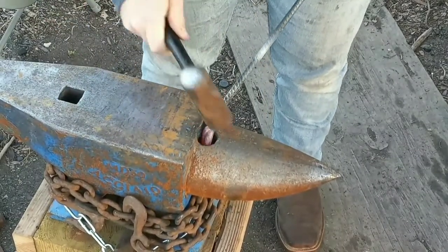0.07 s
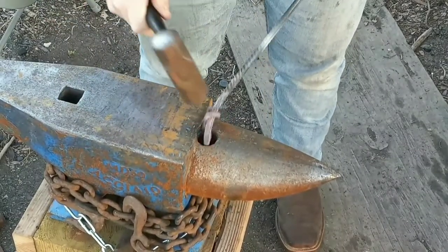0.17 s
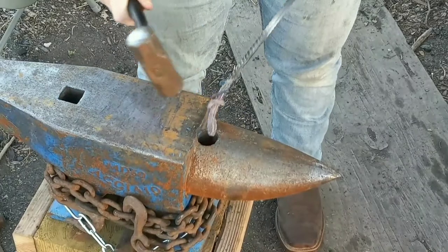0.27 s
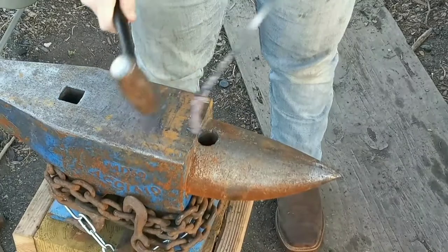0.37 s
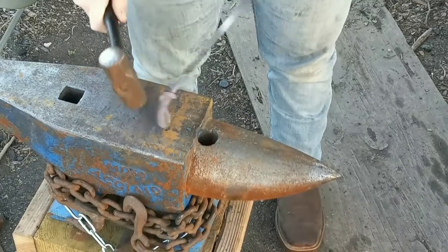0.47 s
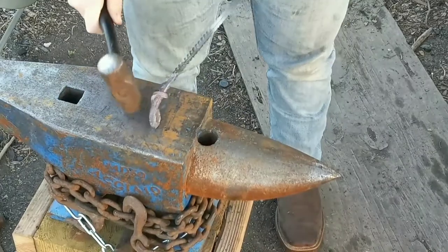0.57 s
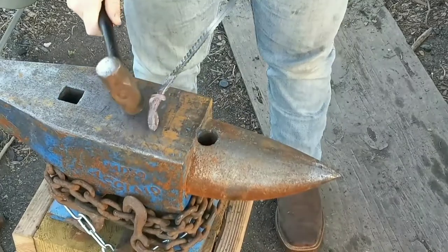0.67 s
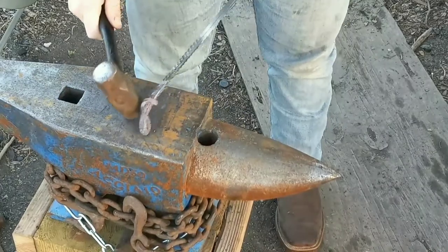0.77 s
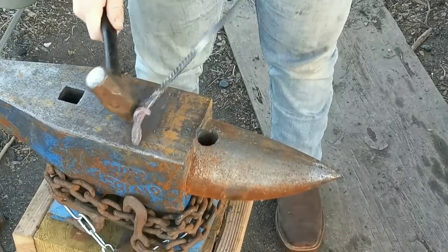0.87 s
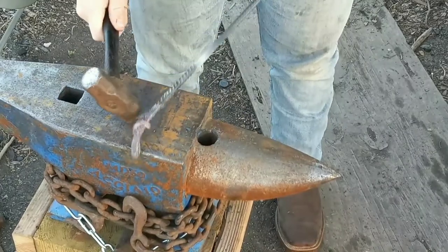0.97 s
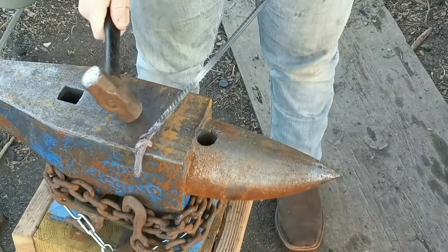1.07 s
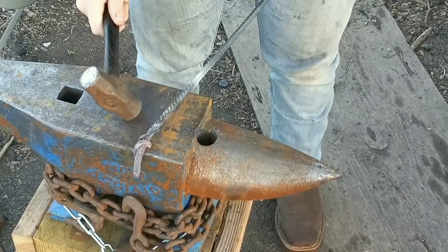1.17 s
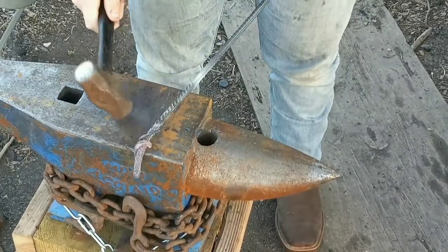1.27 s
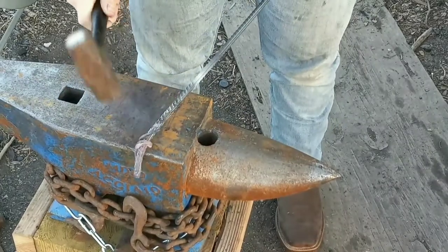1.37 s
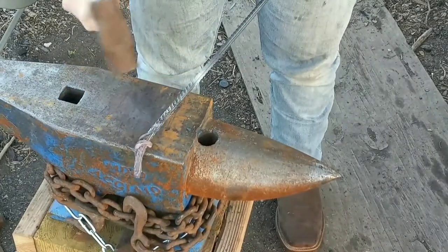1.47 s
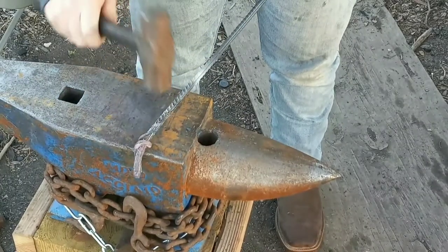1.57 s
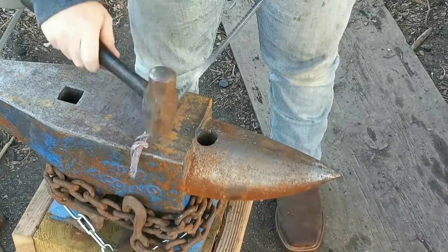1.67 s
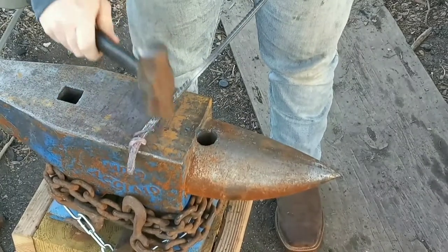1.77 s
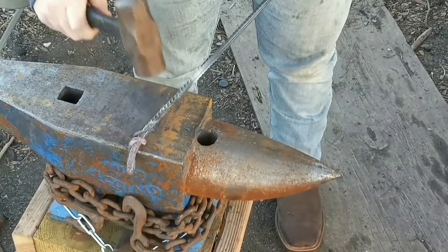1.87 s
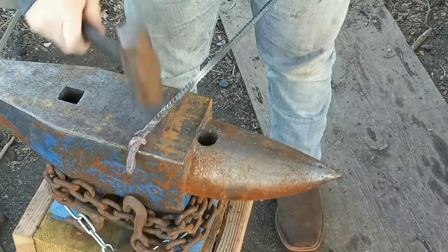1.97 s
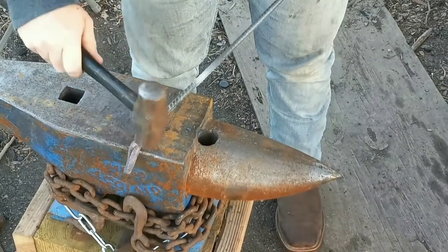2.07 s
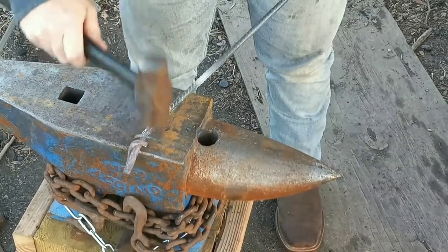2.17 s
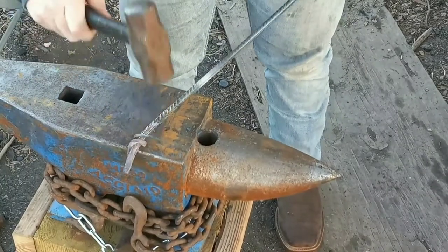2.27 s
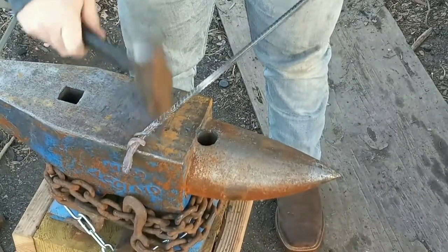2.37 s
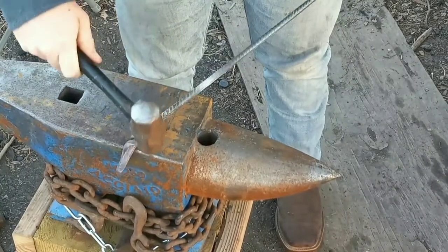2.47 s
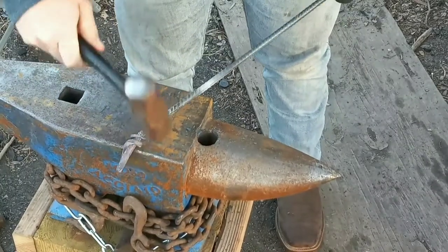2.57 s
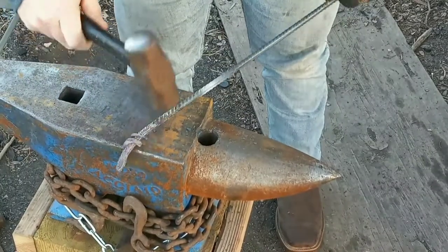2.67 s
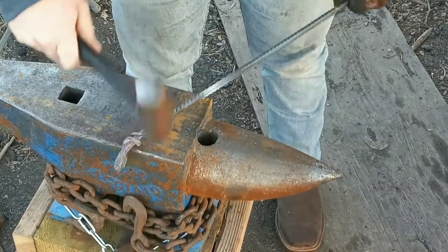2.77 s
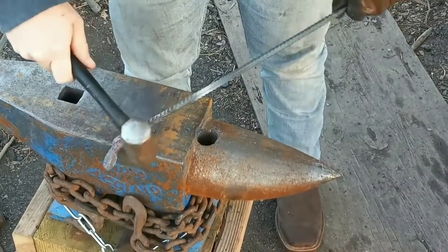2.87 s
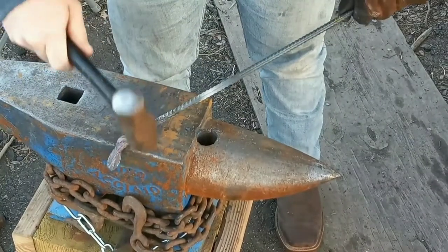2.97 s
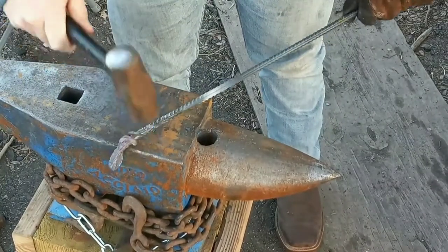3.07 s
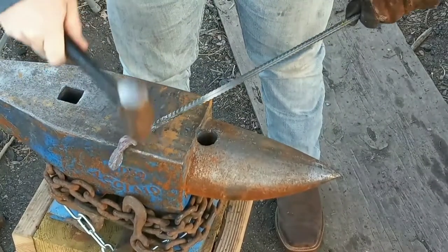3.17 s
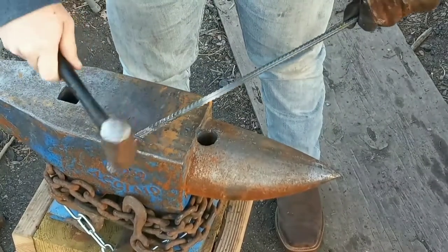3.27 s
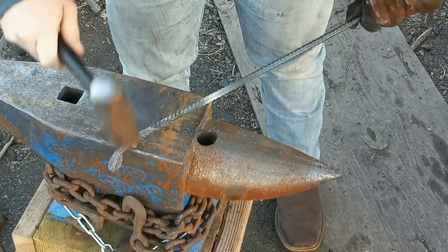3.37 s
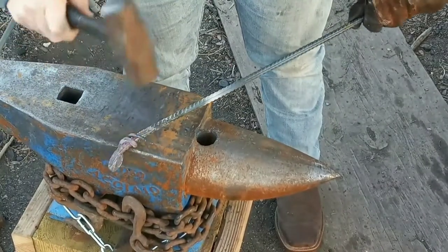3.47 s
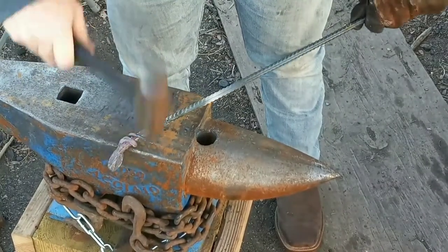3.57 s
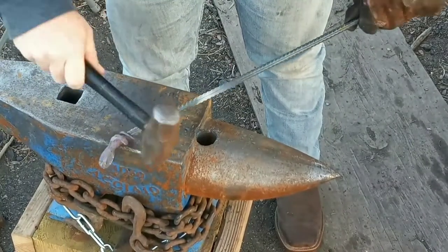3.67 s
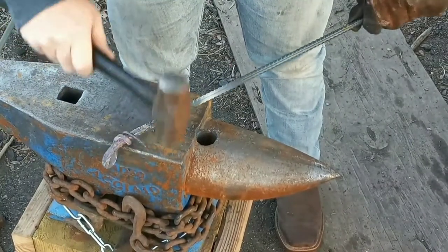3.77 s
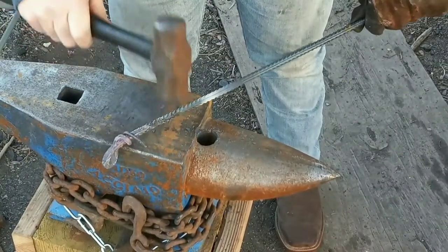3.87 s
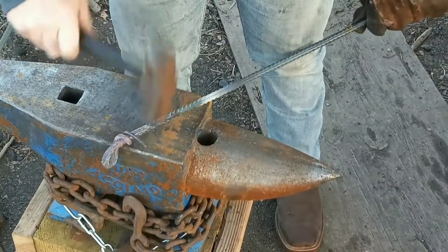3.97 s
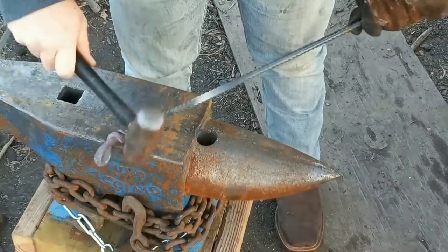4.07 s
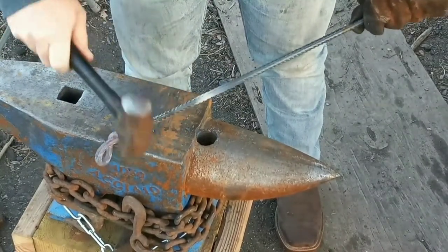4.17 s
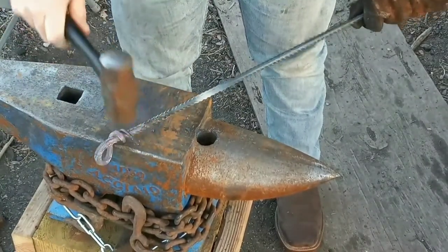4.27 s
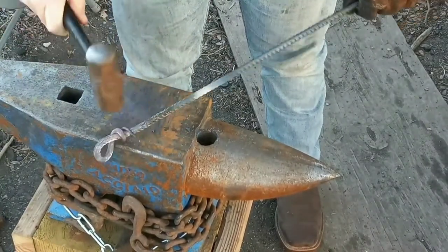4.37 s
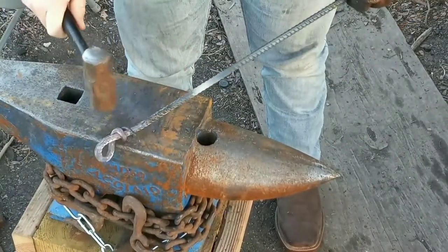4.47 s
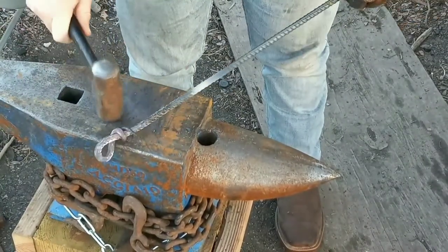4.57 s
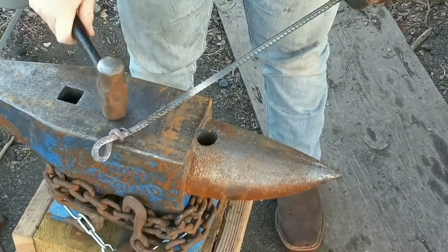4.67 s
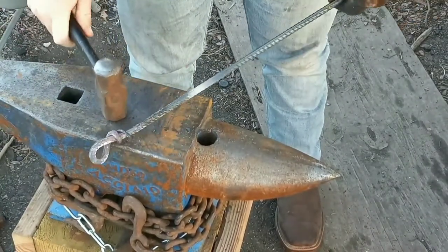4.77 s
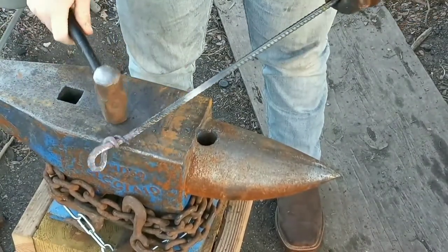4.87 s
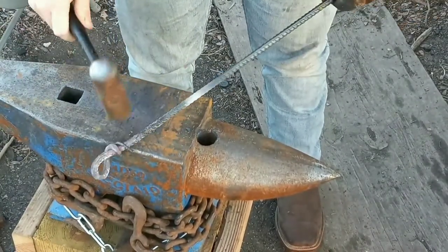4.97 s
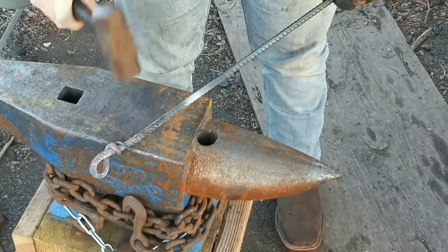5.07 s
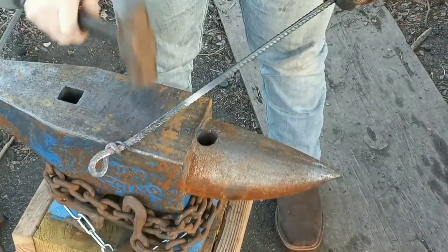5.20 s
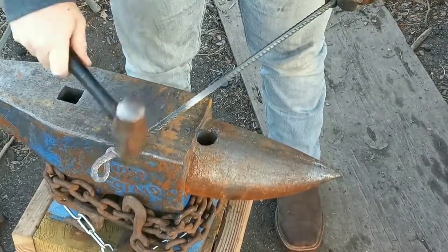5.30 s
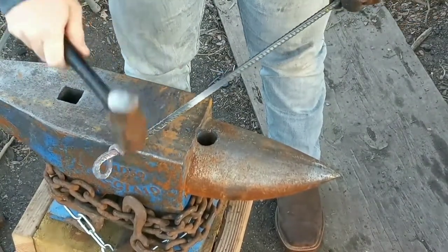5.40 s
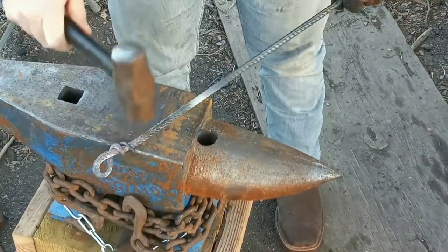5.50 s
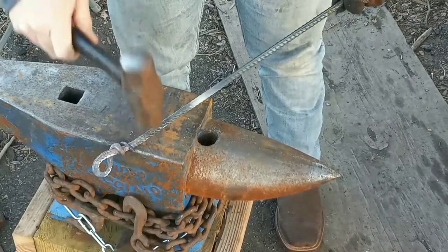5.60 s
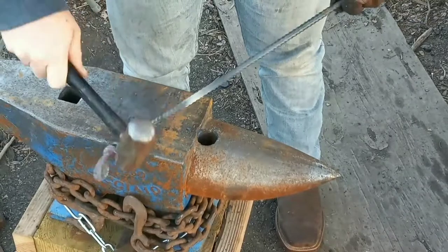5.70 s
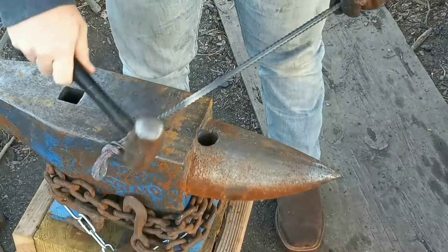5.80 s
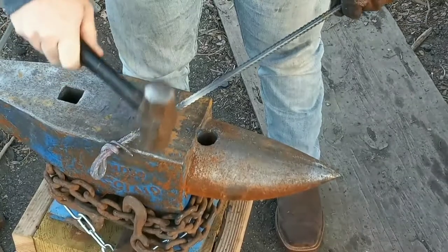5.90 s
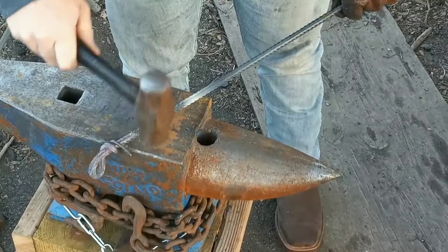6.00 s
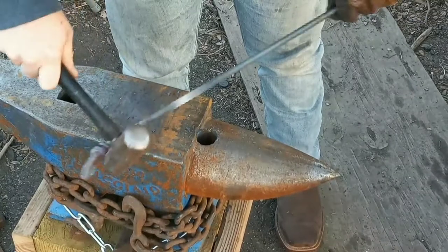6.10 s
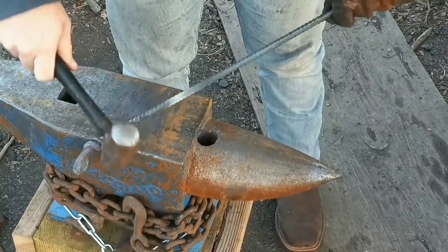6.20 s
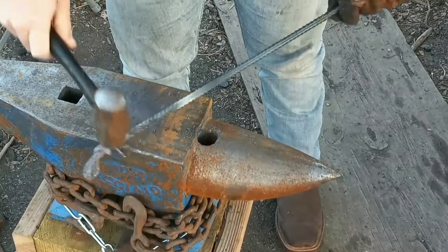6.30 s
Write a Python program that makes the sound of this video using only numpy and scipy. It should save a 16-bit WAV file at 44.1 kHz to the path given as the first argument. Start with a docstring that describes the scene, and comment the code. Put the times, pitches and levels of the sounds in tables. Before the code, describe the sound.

A hammer clatters to rest on an anvil in sharp, ringing bounces, then beats a hot steel bar with even, gritty knocks that gain force. A second run of bounces leads into three more dull blows, with small ticks and a faint hum from the bar. The microphone is close, in an open yard with very little echo and a soft, uneven wind rumble.

```python
"""A hand hammer works a hot steel bar on a chained anvil, outdoors and close up.
On the soft hot bar it lands with a dull crunch of cracking scale; dropped on the bare face it
bounces, rings the anvil and rattles the chain. The bar ticks, scrapes and hums at its cold end.
Wind buffets both microphone ports over a faint yard echo, a far murmur and a thin hiss."""
import sys
import numpy as np
from scipy import signal
from scipy.fft import rfft, irfft, next_fast_len
from scipy.io import wavfile
from scipy.ndimage import map_coordinates

SR = 44100
rng = np.random.default_rng(int(sys.argv[2]) if len(sys.argv) > 2 else 0)


def file_out(sig):
    """Save sig as 16-bit WAV at sys.argv[1]."""
    # one column per channel
    cols = np.atleast_2d(sig).T
    # limit, then scale
    lim = np.clip(cols, -1, 1)
    pcm = np.round(lim * 32767).astype(np.int16)
    wavfile.write(sys.argv[1], SR, pcm)


N = 279594
STEEL_LAG_S = .00009  # the steel reaches the right port after the left

# Blows on the hot bar, with a fader for each layer:
# (time [s], crunch [dB], thud [dB], knock [dB], anvil ring [dB], crunch t60 [s])
BLOW_CUES = [(1.0791, -34.5, -48, -39.5, -58, 0.069), (1.6472, -41, -51.5, -62, -79.5, 0.11),
             (2.028, -29, -33.5, -33, -52, 0.11), (2.4319, -30, -45, -43, -52.5, 0.08),
             (2.814, -33, -46.5, -55, -48.5, .11), (3.2094, -28, -38.5, -40, -26, 0.089),
             (3.6086, -21, -35, -30, -23.5, 0.082), (4.0217, -17.5, -27.5, -19, -36, 0.087),
             (5.2951, -26, -26, -21, -46, 0.097), (5.694, -33, -45, -33, -55, 0.1),
             (6.098, -18.5, -34, -29.5, -51, 0.08)]
# Colours of bright cracking scale, low thud and hollow knock: (frequency [Hz], level [dB])
CRUNCH_EQ = [(710, -7.5), (1200, -12), (3120, -8.5), (3400, -11), (4830, -5), (9960, -12), (14300, -9.5),
             (16000, -11), (16500, -44)]
THUD_EQ = [(76, -45), (130, 2), (323, 7.5), (550, -10), (720, -11), (1210, -120)]
KNOCK_EQ = [(320, -15.5), (550, 5), (1210, -1.5), (1480, -7), (1680, -25), (1950, -14.5), (2500, -20.5),
            (3250, -52), (5500, -120)]


def hammer_blows():
    """The hot bar squashes: scale cracks and sprays, bar and stand knock, a few anvil modes ring on."""
    out, t = np.zeros((2, N + SR)), np.arange(SR // 3) / SR
    crack = lambda at: amp(-60 * np.abs(t - at) / np.where(t < at, .003, .012))
    attack = 1 - np.exp(-t / .0014)
    for start, crunch_db, thud_db, knock_db, ring_db, t60 in BLOW_CUES:
        cracks = crack(.00085) + .45 * crack(rng.uniform(.0023, .014))  # the bar rebounds on the face
        spray = amp(-60 * (t / t60) ** 1.44) + cracks + amp(-23.5 - 60 * t / .39)
        clumps = amp(2 * wobble(400, len(t)))  # flakes break in clumps
        crunch = amp(crunch_db - 11.5) * spray * clumps * steel_noise(t, uneven(CRUNCH_EQ))
        crunch += amp(crunch_db - 14) * clang(CRUNCH_EQ, t, t60=.035, count=30)
        thud = amp(thud_db - 60 * t / .12) * (1 - np.exp(-t / .003)) * steel_noise(t, THUD_EQ)
        knock = amp(knock_db - 11.5 - 60 * t / .12) * steel_noise(t, uneven(KNOCK_EQ))
        knock += amp(knock_db - 12) * clang(KNOCK_EQ, t, t60=.045, count=30)
        anvil = amp(ring_db) * anvil_ring(t, through_bar=True)
        add(out, start - .0005, attack * (crunch + thud + knock + anvil))
    return out[:, :N]


# Two drops on the bare face, each a quickening, fading run of bounces: (time [s], level [dB])
BOUNCE_CUES = [(0.4204, -2.5), (0.5374, -2.5), (0.6133, -6.5), (0.6775, -10.5), (0.73, -13.5),
               (0.7726, -18), (0.8056, -24), (0.835, -26), (0.8544, -29), (0.8675, -35), (4.4498, -7),
               (4.5377, -8), (4.5967, -7), (4.6431, -9), (4.6806, -10.5), (4.7155, -13.5), (4.7479, -16),
               (4.7775, -22), (4.7985, -26), (4.8105, -31)]
# Each drop lands on its own spot: (from [s], body [dB], treble [dB], stand knock [dB], rattle [dB])
FACE_SPOTS = [(0, -1, -8, -0.07, -33.5), (4, 2.5, 1.5, -1.04, -22)]
# The head settles on the face and stills it: (fade start [s], fade end [s])
HEAD_RESTS = [(0.872, 1.3), (4.825, 5.16)]


def hammer_bounces():
    """Steel meets steel: a sharp pulse, a ringing body and a rattle; weaker bounces sound duller."""
    out, t = np.zeros((2, N + SR)), np.arange(SR // 4) / SR
    attack = 1 - np.exp(-(t / .0013) ** 2)
    tracking = np.array([.027, .38, -.11, .38])  # body, treble, knock, rattle: dB per dB of bounce
    for start, db in BOUNCE_CUES:
        spot = [row for row in FACE_SPOTS if row[0] <= start][-1]
        body_db, treble_db, knock_db, rattle_db = np.add(spot[1:], db * tracking)
        body = amp(-10.5) * clack(t)
        body += amp(-4) * anvil_ring(t, sustain=1 + db / 70)  # low bounces damp the face more
        body += amp(-13) * clang(CLACK_EQ, t, t60=.045, count=40)
        tilt = [(500, knock_db), (1000, .01), (3200, 0), (4000, treble_db)]
        hit = filtered(amp(body_db) * attack * body, lambda hz: amp(along(tilt, hz)))
        rattle = amp(rattle_db) * chain_rattle(t)
        add(out, start - .0007, amp(db) * (hit + contact_pulse(t, db) + rattle))
    clock = np.arange(N) / SR
    stilled_db = sum(np.interp(clock, [a, b, b + 1, b + 2], [0, -5, -5, 0]) for a, b in HEAD_RESTS)
    return out[:, :N] * amp(stilled_db)


def contact_pulse(t, db):
    """The head stops dead: a brief suction between two small pushes, longer for a softer contact."""
    centre_hz = 1950 + 22 * db
    u = (np.pi * centre_hz * (t - .0006)) ** 2
    return lag_right(-(1 - 2 * u) * np.exp(-u) * amp([[2], [2]]), STEEL_LAG_S)


# Colour of steel on steel: (frequency [Hz], level [dB])
CLACK_EQ = [(100, -30), (200, -14.5), (600, -17.5), (1100, -12), (1600, -28), (2200, -15.5), (3000, -21.5),
            (4500, -16), (6500, -24.5), (9000, -43), (13000, -32), (16500, -44)]
# Its decay: (frequency [Hz], t60 [s])
CLACK_DECAY = [(300, 0.11), (1000, 0.021), (3000, 0.071), (8000, 0.12), (15000, 0.048)]


def clack(t):
    """The hard contact gives a noise burst that dies band by band."""
    return band_decay(steel_noise(t, CLACK_EQ), CLACK_DECAY, window=128)[:, :len(t)]


# Anvil modes: (frequency [Hz], level on the bare face [dB], level through the bar [dB], t60 [s])
ANVIL_MODES = [(312, -10, -60, .046), (544, -8, -60, .045), (750, -14, -60, .04), (1253, -19, -60, .04),
               (1949, 0, -40, .08), (1958, -36, -60, .5), (2448, -35, -45, .5), (2457, -13, 0, .19),
               (2695, -19, -18, .08), (2888, -17, -40, .07), (4022, -15, -35, .08), (5424, -12, -40, .16),
               (5795, -20, -27, .13), (6900, -30, -45, .07), (7150, -19, -40, .07), (7720, -27, -40, .06),
               (10480, -34, -45, .07), (11125, -31, -22, .08), (11700, -33, -45, .18),
               (12320, -34, -40, .07), (12500, -29, -45, .1), (12990, -34, -45, .06), (13400, -41, -28, .2),
               (14350, -31, -45, .12), (15140, -28, -40, .11)]


def anvil_ring(t, through_bar=False, sustain=1):
    """The struck anvil rings; the hot bar cushions most of its modes."""
    hz, bare_db, cushioned_db, t60 = np.transpose(ANVIL_MODES)
    return ring(hz, cushioned_db if through_bar else bare_db, t60 * sustain, t)


def clang(eq, t, t60, count):
    """Short modes of head, chain and stand, a different set woken by each contact."""
    hz = np.exp(rng.uniform(np.log(250), np.log(16000), count))
    db = along(eq, hz) + 10 * np.log10(hz)  # higher modes stand for wider bands
    db -= 10 * np.log10(np.sum(amp(db) ** 2) / 2)
    decays = t60 * np.exp(.42 * rng.standard_normal(count))
    short = t[:len(t) // 2]
    return np.pad(ring(hz, db, decays, short), ((0, 0), (0, len(t) - len(short))))


# Colour of the chain: (frequency [Hz], level [dB])
CHAIN_EQ = [(120, -41), (200, -9.5), (1640, -13), (2460, -8.5), (4790, -25.5), (5550, -16), (6430, -24.5),
            (15300, -26), (16500, -46.5)]


def chain_rattle(t):
    """The anvil's chain chatters briefly after a bounce."""
    chatter = amp(3.1 * wobble(220, len(t)) - 60 * t / .2) * (1 - np.exp(-t / .01))
    return chatter * noise(len(t), CHAIN_EQ, [(500, .96), (8000, .27)], STEEL_LAG_S)


# Light contacts: (time [s], grit level [dB], knock level [dB])
TICK_CUES = [(0.1664, -92, -67.5), (0.2319, -74, -85), (0.4806, -32.5, -42.5), (0.597, -42, -32),
             (1.7594, -76, -69), (2.401, -75.5, -79.5), (2.573, -78, -87), (3.3254, -75, -65),
             (3.8272, -71.5, -88), (4.1889, -62, -92), (4.3824, -68, -86), (6.133, -56, -73),
             (6.1498, -72, -49.5), (6.1674, -63.5, -57), (6.1846, -66, -58), (6.2194, -82, -63.5)]


def bar_ticks():
    """The bar touches or shifts on the steel and scale flakes off: a puff of grit and a soft knock."""
    out, t = np.zeros((2, N + SR)), np.arange(SR // 4) / SR
    swell = lambda peak_s: t / peak_s * np.exp(1 - t / peak_s)
    for start, grit_db, knock_db in TICK_CUES:
        grit = amp(grit_db) * swell(peak_s=.0037) * steel_noise(t, CRUNCH_EQ, lag=0)
        knock = amp(knock_db) * swell(peak_s=.0066) * steel_noise(t, KNOCK_EQ, lag=0)
        add(out, start - .002, grit + knock)
    return out[:, :N]


# Notes of the bar's free end: (time [s], pitch [Hz], level [dB], t60 [s])
HUM_CUES = [(0, 860, -68, .5), (1.08, 860, -67, .8), (4.025, 590, -47, .22), (5.3, 590, -43, .3),
            (5.698, 600, -46, .08)]


def bar_hum():
    """The long cold end hums with a wavering level, at a pitch set by the grip."""
    out, t = np.zeros((2, N + SR)), np.arange(SR // 2) / SR
    for start, hz, db, t60 in HUM_CUES:
        add(out, start, amp(2.5 * wobble(30, len(t))) * ring([hz], db, [t60], t))
    return out[:, :N]


# Colour of the gritty slide: (frequency [Hz], level [dB])
SCRAPE_EQ = [(3000, -3), (6000, -10), (8000, 0.5), (11500, -1.5), (14000, -38), (16500, -24)]


def bar_scrape(start_s=.99, end_s=1.08, end_db=-67):
    """The bar slides over the face with a short, rising hiss."""
    out = np.zeros((2, N))
    ramp = np.linspace(0, 1, round((end_s - start_s) * SR))
    envelope = ramp * amp(end_db + 3.1 * wobble(42, len(ramp)))
    add(out, start_s, envelope * steel_noise(ramp, SCRAPE_EQ, lag=0))
    return out


# Gust automation: (time [s], level [dB], left minus right [dB])
GUST_FADER = [(0.0, -55, 4), (0.32, -42, -4), (0.85, -44.5, -1.5), (0.88, -49.5, -27), (1.08, -47, 3.0),
              (1.85, -51, -5.0), (1.89, -50, 11.5), (1.94, -37.5, -1), (2.08, -60.5, -1), (3.28, -40, -3),
              (3.32, -27, 1), (3.53, -62.5, 1.5), (3.69, -36, -7), (3.74, -41, 26), (3.76, -47, 4.5),
              (3.94, -31.5, 1.0), (3.97, -61, -18), (4.08, -36, -1.5), (4.24, -57, 11), (4.41, -41, -2.5),
              (5.05, -56.5, 5.5), (5.08, -41.5, 5), (5.72, -58, 1), (6.0, -40.5, -16), (6.18, -39, -15.5),
              (6.34, -34, 0.5)]
# Colour of the rumble: (frequency [Hz], level [dB])
BUFFET_EQ = [(12, -57), (20, -28.5), (59, -8), (81, -4), (173, -27), (232, -31), (280, -34), (403, -45.5),
             (431, -46), (500, -59.5), (650, -78.5), (1100, -120)]


def wind():
    """Low buffeting: slow puffs that hit both ports, and faster lumps of each port's own."""
    db, pan_db = curves(GUST_FADER)
    puffs_db = 3 * wobble(9)
    lumps_db = 4.3 * np.array([wobble(42), wobble(29)])
    rumble = noise(N, BUFFET_EQ, [(40, .063), (100, .15), (300, .49)])
    return amp(db + np.array([pan_db, -pan_db]) / 2) * unit(amp(puffs_db + lumps_db) * rumble)


# Reverb time of the yard: (frequency [Hz], t60 [s])
YARD_DECAY = [(200, 1.2), (1500, 0.78), (5000, 1.1), (12000, 0.37)]


def yard_echo(hits, wet_db=-41):
    """The walls around the yard answer faintly; each band dies at its own speed."""
    tail = band_decay(rng.standard_normal((2, SR)), YARD_DECAY, window=256)
    return amp(wet_db) * signal.fftconvolve(hits, tail / np.linalg.norm(tail[0]), axes=1)[:, :N]


# Murmur automation: (time [s], level [dB])
MURMUR_FADER = [(0, -70), (.4, -66), (1.1, -65), (1.4, -74.5), (1.95, -71.5), (2.35, -79), (2.9, -71.5),
                (3.8, -71), (4.4, -69.5), (5.1, -78), (5.9, -79.5), (6.15, -64), (6.34, -72)]
# Colours of the murmur and the hiss: (frequency [Hz], level [dB])
MURMUR_EQ = [(120, -37.5), (200, -6.5), (291, -5.5), (343, -15.5), (430, -17.5), (559, -16), (856, -18.5),
             (4000, -37), (5200, -74.5), (8800, -120)]
HISS_EQ = [(1470, -36), (2500, -5), (2680, -9), (6920, -3.5), (12800, -3.5), (15100, 3.5), (16500, -19)]


def outdoor_hush():
    """A bed of far murmur and a thin hiss that swells a little with it."""
    murmur_db, = curves(MURMUR_FADER)
    murmur = amp(murmur_db + 1.3 * wobble(4)) * noise(N, MURMUR_EQ, [(300, .44), (3000, .059)])
    hiss_db = -80.5 + .33 * (murmur_db - murmur_db.mean()) + .36 * wobble(6.7)
    return murmur + amp(hiss_db) * noise(N, HISS_EQ, [(3000, .32), (15000, .11)])


# Direction of the modes: (frequency [Hz], phase lead of the left port [rad])
MODE_PHASE = [(0, -6.5), (2930, 2), (4050, 4.5), (5510, 4), (5770, -15), (7150, 18.5), (7670, -6),
              (8610, 0), (9560, 11), (10700, 6), (11100, -1), (12100, -9), (13700, -1.5), (16400, 5)]


def ring(hz, db, t60, t):
    """Damped modes, each at a new strength and from its own side; low ones swell more slowly."""
    hz, t60 = np.asarray(hz, float), np.asarray(t60)
    strength = amp(db + np.where(hz > 3000, 3, 1.5) * rng.standard_normal(hz.shape))
    modes = np.exp(np.outer(2j * np.pi * hz - np.log(1000) / t60, t))
    attack = 1 - np.exp(-np.outer(hz, t) / .43)
    direction = np.exp(1j * np.outer([.5, -.5], along(MODE_PHASE, hz)))
    return np.imag((strength * direction) @ (modes * attack))


# Stereo image of the contacts: (frequency [Hz], left-right correlation [0 to 1])
STEEL_IMAGE = [(200, 0.95), (1000, 0.82), (3000, 0.94), (8000, 0.16), (15000, 0.56)]


def steel_noise(t, eq, lag=STEEL_LAG_S):
    """Coloured noise as long as t, in the stereo image of the steel."""
    return noise(len(t), eq, STEEL_IMAGE, lag)


def noise(size, eq, correlation, lag=0):
    """Stereo noise of rms 1, with colour and left-right correlation set along frequency."""
    def mid_side(hz):
        width = np.arccos(np.clip(along(correlation, hz), -1, 1)) / 2
        return amp(along(eq, hz)) * [np.cos(width), np.sin(width)]
    mid, side = filtered(rng.standard_normal((2, size)), mid_side)
    return unit(lag_right(np.array([mid + side, mid - side]), lag))


def uneven(eq):
    """The same colour with new bumps and dips: no two blows land alike."""
    hz = np.geomspace(100, 16500, num=36)
    return np.transpose([hz, along(eq, hz) + 4 * rng.standard_normal(len(hz))])


def band_decay(x, decay, window):
    """Fades each band by 60 dB over its own t60."""
    hz, t, bands = signal.stft(x, SR, nperseg=window)
    return signal.istft(bands * amp(-60 * t / along(decay, hz)[:, None]), SR, nperseg=window)[1]


def lag_right(pair, lag):
    """The right channel lags the left by lag seconds."""
    return filtered(pair, lambda hz: np.exp(1j * np.pi * hz * lag * np.array([[1], [-1]])))


def filtered(x, response):
    """x through a complex frequency response."""
    size = next_fast_len(x.shape[-1] + 4096)
    return irfft(rfft(x, size) * response(np.fft.rfftfreq(size, 1 / SR)), size)[..., :x.shape[-1]]


def wobble(rate, size=N):
    """A smooth random curve, rate knots a second."""
    knots = rng.standard_normal(int(size * rate / SR) + 4)
    return map_coordinates(knots, [np.arange(size) * rate / SR])


def curves(rows):
    """Automation: one value per sample for each column after the time."""
    times, *columns = np.transpose(rows)
    return [np.interp(np.arange(N) / SR, times, column) for column in columns]


def along(points, hz):
    """Reads (frequency [Hz], value) points on a log axis."""
    knots_hz, values = np.transpose(points)
    return np.interp(np.log(hz + 1), np.log(knots_hz + 1), values)


def amp(db):
    """Gain of a level in dB."""
    return 10 ** (np.asarray(db) / 20)


def unit(x):
    """Scaled to rms 1."""
    return x / np.sqrt(np.mean(x ** 2) + 1e-20)


def add(track, s, sound):
    """Lays a sound on the track from second s."""
    track[:, round(s * SR):round(s * SR) + sound.shape[-1]] += sound


def scene():
    """The mix at the two ports: hammer and its echo, bar handling, wind and hush."""
    hits = hammer_bounces() + hammer_blows()
    return hits + yard_echo(hits) + bar_ticks() + bar_hum() + bar_scrape() + wind() + outdoor_hush()


def record(dry):
    """A brick-wall high cut at 16.8 kHz."""
    return filtered(dry, lambda hz: hz < 16800)


dry = scene()
out = record(dry)
file_out(out)
```